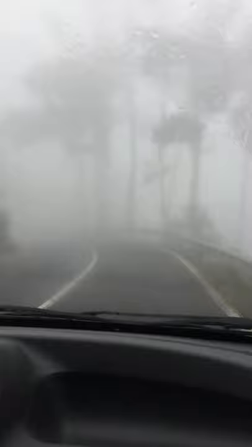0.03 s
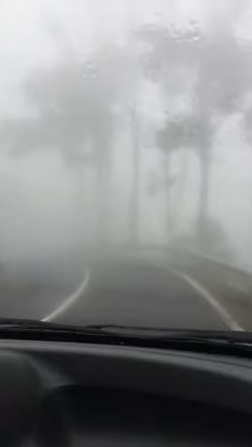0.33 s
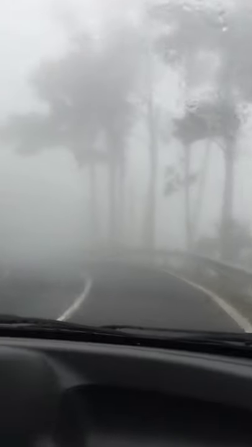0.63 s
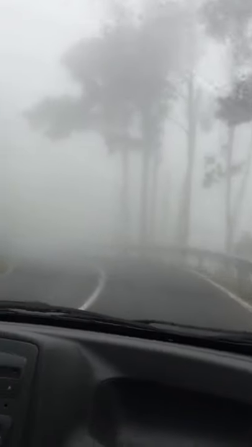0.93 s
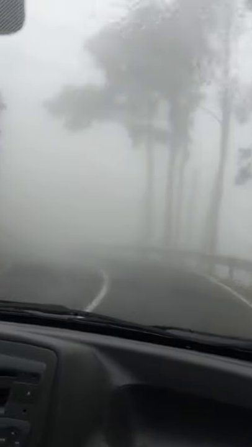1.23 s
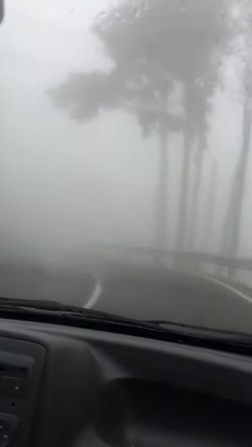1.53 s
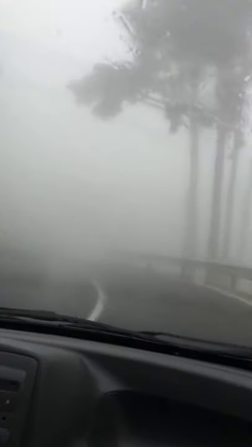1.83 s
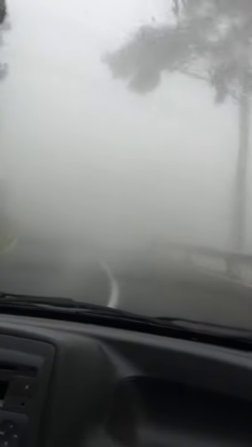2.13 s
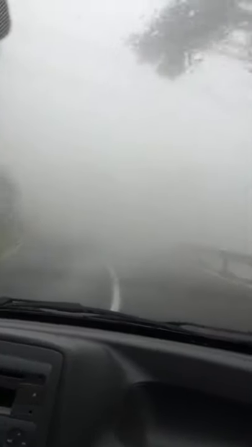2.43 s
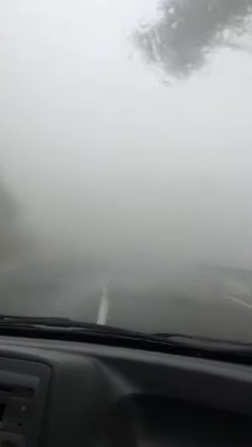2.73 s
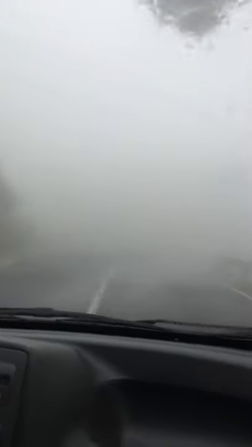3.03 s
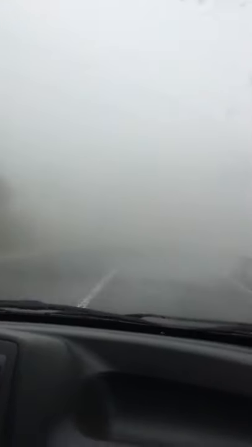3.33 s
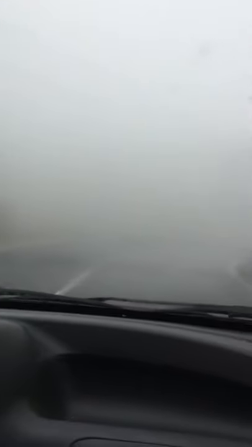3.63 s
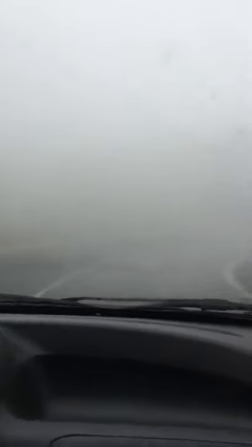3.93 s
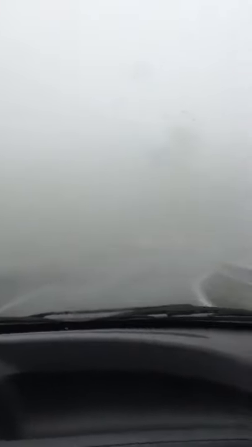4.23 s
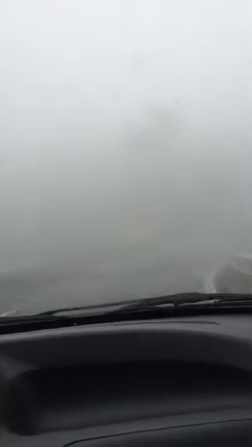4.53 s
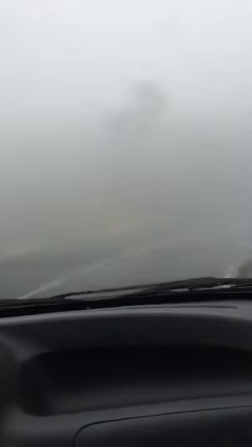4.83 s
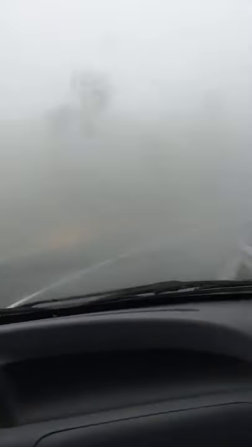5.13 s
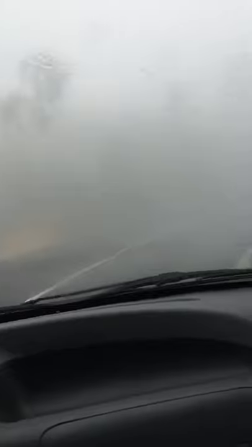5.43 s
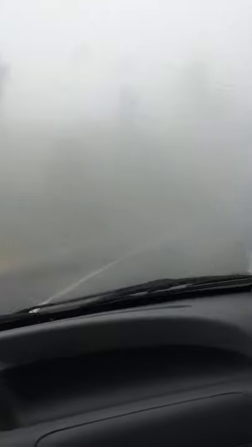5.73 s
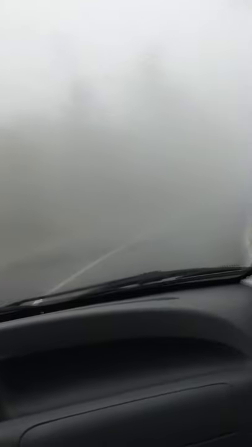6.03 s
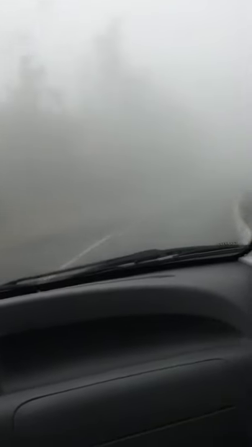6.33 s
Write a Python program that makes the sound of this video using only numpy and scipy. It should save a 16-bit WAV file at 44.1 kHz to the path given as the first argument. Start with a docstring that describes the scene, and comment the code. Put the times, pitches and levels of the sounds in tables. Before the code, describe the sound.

A small car drives along a wet road, heard from inside as a continuous low rumble and boom with a softly running engine. A couple of soft bumps come first, then a firmer thud and several smaller jolts. Light, scattered ticks of water on the glass and brief dull rattles of plastic trim grow more frequent from about halfway. The tyres hiss very faintly, and the engine note sinks gently as the car slows.

```python
"""Small car on a wet road

Inside a small car easing through bends in the fog, the tyres shake the body and make the cabin
air boom over a softly running engine. Thrown-up water hisses faintly, drops tick on the
windscreen, loose trim rattles, and a brake pad sings thinly on its disc while the car slows."""
import sys
import numpy as np
from scipy import signal
from scipy.fft import rfft, irfft, next_fast_len
from scipy.io import wavfile
from scipy.ndimage import uniform_filter1d, map_coordinates

SR = 44100
rng = np.random.default_rng(int(sys.argv[2]) if len(sys.argv) > 2 else 0)


def transcribe(signal):
    """Save signal, clipped to [-1, 1], as a 16-bit WAV file at the path in sys.argv[1]."""
    frames = np.atleast_2d(signal).T
    limited = np.clip(frames, -1, 1)
    pcm = np.round(limited * 32767).astype(np.int16)
    wavfile.write(sys.argv[1], SR, pcm)


N = 290178

# how hard the plain road shakes the car (time [s], cabin boom [dB], body rumble [dB])
SHAKE_LEVELS = [(0, -32.5, -33.5), (.6, -35.5, -26.5), (1.1, -32.5, -32.5), (2.8, -33.5, -30.5),
                (3.7, -38.5, -35), (4.7, -34, -29.5), (5.4, -39, -30.5), (6.6, -40.5, -34)]
# bumps: soft ones boom, hard ones thud, and a negative lift is a lull as the wheels go light
# (peak time [s], half length [s], lift [dB], hardness [0-1])
ROAD_BUMPS = [(0.116, .07, 16, 0.09), (0.293, 0.017, 7, .95), (0.607, 0.074, 12.5, 0.03),
              (1.58, 0.032, 10, 0.72), (1.724, 0.055, 16, 0.8), (1.87, .06, -9.5, .55),
              (2.005, 0.024, 8, 1), (2.22, .12, 8, 0), (2.745, 0.068, 8.5, 0.1), (3.149, 0.062, 5.5, 0.7),
              (3.685, 0.044, 8, 1), (4.085, 0.029, 11.5, 1), (4.2, 0.044, 9, .05),
              (4.723, 0.061, 8.5, 0.37)]
# air ringing inside the tyres (time [s], pitch [Hz], level [dB], throb depth [dB])
TYRE_AIR = [(0, 127, -35.5, 4), (1.2, 127, -39, 4), (3, 128.5, -34.5, 4), (4, 129, -35, 4),
            (4.5, 131.5, -33.5, 2.5), (5.3, 129.5, -31.8, 2.6), (6.6, 127.5, -32, 3)]
# noise from the road surface (time [s], floor [dB], panels [dB], tread roar [dB])
ROAD_LEVELS = [(0, -43, -47, -53.5), (1, -40, -48, -54.5), (1.7, -35.5, -47.5, -56),
               (2.3, -40.5, -48, -56.5), (2.9, -36.5, -45.5, -56), (3.7, -39.5, -45.5, -54.5),
               (5.3, -41, -49.5, -57), (5.95, -40.5, -47, -57.5), (6.6, -43.5, -47, -57)]
# crankshaft speed, sinking twice as the driver eases off (time [s], speed [turns/s])
ENGINE_SPEED = [(0, 44.4), (.75, 40.9), (1.35, 38.3), (2.4, 37.2), (4.15, 38.1), (4.7, 37.5), (5.5, 34.4),
                (5.9, 33.6), (6.6, 33.2)]
# the engine's tones (multiple of the crankshaft speed, level [dB])
ENGINE_TONES = [(2, -36), (3, -45), (4, -43.5), (5, -56.5), (6, -64), (7, -57.5), (8, -53), (10, -61.5),
                (11, -66), (14, -71), (16, -67), (18, -68.5), (22, -75.5), (24, -74.5), (25, -75),
                (47, -78.5)]
# the whine of a pair of gears (time [s], level [dB])
GEAR_LEVELS = [(0, -61.5), (1.15, -59.5), (2.7, -74), (5.3, -72.5), (6, -64), (6.6, -67)]
# water thrown up by the tyres (time [s], level [dB])
SPRAY_LEVELS = [(0, -73), (.9, -77.5), (1.65, -73.5), (2.3, -77.5), (3.45, -77), (3.9, -70.5), (4.7, -71.5),
                (5.7, -72.5), (6.6, -75.5)]
# puddles the tyres swish through (peak time [s], half length [s], lift [dB])
PUDDLE_SWISHES = [(1.654, 0.05, 5.5), (3.322, .02, 4.5), (3.789, 0.027, 6), (4.365, 0.046, 4.5),
                  (5.168, .05, 1.5)]
# large drops and grit hitting the glass (time [s], level [dB], ring [Hz])
GLASS_HITS = [(.844, -57, 7800), (1.577, -60, 5100), (1.638, -60.5, 3700), (1.666, -55.5, 4230),
              (3.518, -60.5, 3700), (3.791, -55.5, 4050), (3.873, -53, 3970), (4.1, -55, 6040),
              (4.124, -56.5, 6070), (4.385, -57, 9000), (4.562, -55.5, 5660), (4.6155, -49.5, 4830),
              (4.822, -64, 7340), (4.89, -62, 8600), (4.925, -59.5, 8800), (5.028, -58.5, 8900),
              (5.178, -61, 4160), (5.371, -63.5, 11900), (5.467, -62, 9200), (5.564, -61.5, 8550),
              (5.804, -52.5, 4820), (5.934, -59.5, 11600)]
# loose trim chattering (time [s], level [dB], ring [Hz], time to fade by 60 dB [s])
TRIM_HITS = [(1.634, -61, 3900, .12), (1.97, -64, 2700, .08), (3.744, -48.5, 1400, .05),
             (3.873, -60, 3800, .04), (4.334, -60, 3000, .08), (4.616, -56, 2900, .035),
             (4.747, -51.5, 2150, .08), (5.122, -56.5, 1500, .14), (5.572, -58, 2400, .05),
             (5.937, -54.5, 1200, .12), (5.948, -63, 2800, .08), (6.208, -59, 900, .1)]
# a brake pad brushing its disc (peak time [s], half length [s], pitch [Hz], level [dB])
BRAKE_CHIRPS = [(.12, .05, 9680, -76), (.23, .045, 9720, -77), (.36, .065, 9750, -76),
                (.48, .05, 9820, -75.5), (1.22, .03, 9685, -71.5), (1.3, .055, 9715, -79)]
# the disc rubbing in a bend (peak time [s], half length [s], pitch [Hz], width [Hz], level [dB])
DISC_RUBS = [(2.35, .16, 6550, 90, -87), (2.62, .14, 4300, 600, -79), (3.02, .13, 6560, 90, -91)]

# the tone colour of each noise (frequency [Hz], relative level [dB])
BODY_SPECTRUM = [(20, -46), (42, -21), (54, -10), (66, -9), (78, 1), (95, 1.5), (110, 1), (125, -11.5),
                 (160, -28), (400, -83.5)]
SWAY_SPECTRUM = [(8, -16.5), (16, -14.5), (25, -7), (40, 0), (50, 0.5), (65, -16.5), (200, -78.5)]
FLOOR_SPECTRUM = [(100, -31.5), (130, -6), (145, 5.5), (160, -1), (182, 1), (200, -1.5), (220, -21.5),
                  (260, -26), (500, -71.5)]
PANEL_SPECTRUM = [(120, -39.5), (190, -6.5), (225, 4), (290, -1), (345, -0.5), (390, -9.5), (450, -13),
                  (520, -28.5), (800, -48.5), (2000, -88)]
TREAD_SPECTRUM = [(250, -21.5), (430, 0), (520, 1.5), (700, 0.5), (950, -5), (1100, -6.5), (1400, -9.5),
                  (1600, -12), (2100, -16), (2800, -21), (3800, -27), (5500, -36), (9000, -45),
                  (16000, -62.5)]
SPRAY_SPECTRUM = [(1000, -7), (3000, 3.5), (4500, 0.5), (6500, 0.5), (8500, -3), (11000, -4), (15000, -9)]
DROP_SPECTRUM = [(500, -18.5), (1500, 3), (4000, -1.5), (7000, -1.5), (10000, -5.5), (15000, -9)]
TRIM_SPECTRUM = [(300, -20), (700, 2), (2000, -1.5), (3000, -5.5), (5000, -15.5), (15000, -32)]
# resonances: pitches that stand out of a noise (pitch [Hz], width [Hz], lift [dB])
PANEL_RINGS = [(264, 7.2, 2), (332, 4.5, 2.5), (412.7, 9, 9)]
TREAD_RINGS = [(556, 18, 5.5), (938, 35, 5), (1282, 50, 8), (1770, 55, 6), (2120, 60, 3), (2620, 160, 3.5),
               (2950, 120, 2.5), (3350, 150, 3), (4450, 250, 4)]
SPRAY_RINGS = [(4450, 450, 2), (6600, 300, 1)]


def rumble():
    """The road shakes the body on its springs and sets the air in the cabin and tyres ringing."""
    boom_db, body_db = curves(SHAKE_LEVELS)
    uneven_db = 1.34 * wobble(20)  # rough asphalt moves all four layers together
    soft_db = uneven_db + sum(db * (1 - hard) * swell(s, half) for s, half, db, hard in ROAD_BUMPS)
    hard_db = uneven_db + sum(db * hard * swell(s, half) for s, half, db, hard in ROAD_BUMPS)
    boom = amp(boom_db + soft_db) * hum(58.93, width_hz=6.4, span_s=.09)  # the cabin's lowest note
    body = amp(body_db + hard_db) * steady(noise(BODY_SPECTRUM), span_s=.11)
    tyres = tyre_hum(hard_db)
    sway = amp(-43.5 + uneven_db) * steady(noise(SWAY_SPECTRUM), span_s=.3)
    return boom + body + tyres + sway


def tyre_hum(jolt_db):
    """The air inside the tyres rings on one drifting, throbbing note, louder at each jolt."""
    hz, db, throb_db = curves(TYRE_AIR)
    phase = 2 * np.pi * np.cumsum(hz + 3.5 * wobble(20)) / SR
    return amp(db + .6 * jolt_db + throb_db * wobble(14)) * np.sqrt(2) * np.sin(phase)


def road():
    """Coarse asphalt drums on the floor and the panels; the tyre tread roars above them."""
    floor_db, panel_db, roar_db = curves(ROAD_LEVELS)
    patches_db = .8 * wobble(5)
    floor = amp(floor_db + patches_db) * steady(noise(FLOOR_SPECTRUM), span_s=.14)
    panels = amp(panel_db + patches_db) * steady(noise(PANEL_SPECTRUM, PANEL_RINGS), span_s=.17)
    tread = cabin_colour(noise(TREAD_SPECTRUM, TREAD_RINGS), spacing_hz=30, ripple_db=.9)
    return floor + panels + amp(roar_db + .8 * wobble(40)) * tread


def engine():
    """A four-cylinder engine fires twice a turn; its tones and a gear whine swell with the load."""
    speed, = curves(ENGINE_SPEED)
    gear_db, = curves(GEAR_LEVELS)
    angle = 2 * np.pi * np.cumsum(speed) / SR
    load_db = .16 * (gear_db - gear_db.mean())
    tones = sum(amp(db + load_db + 2.5 * wobble(4)) * np.sin(multiple * angle + .49 * wobble(12))
                for multiple, db in ENGINE_TONES)
    pulse = 1 + .6 * np.cos(angle)  # once a turn
    whine = pulse * np.sin(23 * angle + .9 * wobble(30))
    return tones + amp(gear_db + 1.6 * wobble(7)) * whine


def windscreen_drops():
    """Each drop snaps on the glass with a brief ring; small ones patter more where the road is wetter."""
    wet_db, = curves(SPRAY_LEVELS)
    drops_per_s = 9.9 * amp(wet_db - wet_db.max()) ** 2
    hits = np.flatnonzero(rng.random(N) < drops_per_s / SR)
    size, pitch = rng.standard_normal((len(hits), 2)).T
    patter_db = wet_db[hits] + 3.5 + 1.5 * size
    patter_hz = 6760 * 2 ** (.6 * pitch)
    out = np.zeros(N)
    for s, db, hz in [*GLASS_HITS, *zip(hits / SR, patter_db, patter_hz)]:
        add(out, s, amp(db) * burst(DROP_SPECTRUM, hz, width_hz=900, lift_db=11, fade_s=.025, rise_s=.0004))
    return out


def trim_rattles():
    """Plastic trim chatters dully as the body flexes."""
    out = np.zeros(N)
    for s, db, hz, fade_s in TRIM_HITS:
        knock = burst(TRIM_SPECTRUM, hz, width_hz=500, lift_db=9, fade_s=fade_s, rise_s=.0015)
        add(out, s, amp(db) * knock)
    return out


def spray():
    """Water off the tyres makes a fine hiss, dotted with tiny droplets, that swells in each puddle."""
    wet_db, = curves(SPRAY_LEVELS)
    wet_db = wet_db + sum(db * swell(s, half) for s, half, db in PUDDLE_SWISHES)
    hiss = amp(wet_db + .9 * wobble(30)) * noise(SPRAY_SPECTRUM, SPRAY_RINGS)
    hits = rng.random(N) < 35 / SR  # about 35 droplets a second
    strength = amp(np.minimum(3 * rng.exponential(size=N), 7))
    fade = np.exp(-np.arange(SR // 20) / SR / .004)
    droplets = signal.fftconvolve(hits * strength, fade)[:N] * noise(DROP_SPECTRUM)
    return hiss + amp(wet_db - 2) * droplets


def brake():
    """The disc chirps on one very high, fluttering note, then rubs faintly on lower ones."""
    out = np.zeros(N)
    for s, half, hz, db in BRAKE_CHIRPS:
        phase = 2 * np.pi * np.cumsum(hz + 14 * wobble(80)) / SR
        out += amp(db + 2 * wobble(60)) * swell(s, half) * np.sin(phase)
    for s, half, hz, width_hz, db in DISC_RUBS:
        out += amp(db) * swell(s, half) * hum(hz, width_hz, span_s=.05)
    return out


def cabin_colour(x, spacing_hz, ripple_db):
    """A small cabin's many resonances lift some pitches and lower others."""
    m = next_fast_len(N)
    position = np.fft.rfftfreq(m, 1 / SR) / spacing_hz
    ripple = map_coordinates(rng.standard_normal(SR // 10), [position], mode="mirror")
    return unit(irfft(rfft(x, m) * amp(ripple_db * ripple), m)[:N])


def hum(centre_hz, width_hz, span_s):
    """One resonance kept ringing by random shaking: a tone that wanders and throbs."""
    m = next_fast_len(N + SR)
    detune = 2 * (np.fft.rfftfreq(m, 1 / SR) - centre_hz) / width_hz
    ringing = irfft(rfft(rng.standard_normal(m)) / (1 + detune ** 2), m)
    return steady(ringing[:N], span_s)


def burst(spectrum, hz, width_hz, lift_db, fade_s, rise_s):
    """A short tap: a swift rise, then a ringing noise that drops 60 dB in fade_s."""
    t = np.arange(SR // 5) / SR
    shape = (1 - np.exp(-t / rise_s)) * np.exp(-np.log(1000) * t / fade_s)
    return noise(spectrum, [(hz, width_hz, lift_db)], size=len(t)) * shape / shape.max()


def noise(spectrum, rings=(), size=N):
    """Noise with a broad tone colour and resonances standing out of it."""
    m = next_fast_len(size)
    hz = np.fft.rfftfreq(m, 1 / SR)
    points_hz, db = np.transpose(spectrum)
    gain = amp(np.interp(np.log(hz + 1), np.log(points_hz + 1), db))
    for centre, width, lift in rings:
        detune = 2 * (hz - centre) / width
        gain *= np.sqrt(1 + (amp(lift) ** 2 - 1) / (1 + detune ** 2))
    return unit(irfft(rfft(rng.standard_normal(m)) * gain, m)[:size])


def steady(x, span_s):
    """Even out a noise's swells that last longer than span_s."""
    power = np.abs(uniform_filter1d(x ** 2, max(int(span_s * SR), 2)))
    return unit(x / np.sqrt(power + .018))


def swell(s, half):
    """A smooth rise and fall, about twice half seconds long, that peaks at 1 at s seconds."""
    return np.exp(-((np.arange(N) / SR - s) / half) ** 2)


def wobble(rate):
    """A smooth curve through rate random points a second."""
    return map_coordinates(rng.standard_normal(int(N * rate / SR) + 4), [np.arange(N) * rate / SR])


def curves(rows):
    """One value per sample for each column after the time."""
    s, *columns = np.transpose(rows)
    return [np.interp(np.arange(N) / SR, s, column) for column in columns]


def add(track, s, sound):
    """Mix a sound into the track at s seconds."""
    part = track[max(round(s * SR), 0):][:len(sound)]
    part += sound[:len(part)]


def amp(db):
    """Turn decibels into a gain."""
    return 10 ** (np.asarray(db) / 20)


def unit(x):
    """Scale to an average (rms) level of 1."""
    return x / np.sqrt(np.mean(x ** 2) + 1e-20)


def scene():
    """Everything as it reaches the passenger seat."""
    return (rumble() + road() + engine() + spray() + windscreen_drops() + trim_rattles() + brake())[None]


def record(dry):
    """The sound comes in after a moment of silence, with its highest treble cut off."""
    start_s, rise_s, top_hz = .072, .004, 15400
    fade_in = np.clip((np.arange(N) / SR - start_s) / rise_s, 0, 1)
    m = next_fast_len(N + SR // 2)
    kept = np.fft.rfftfreq(m, 1 / SR) < top_hz
    return irfft(rfft(dry * fade_in, m) * kept, m)[..., :N]


dry = scene()
out = record(dry)
transcribe(out)
```